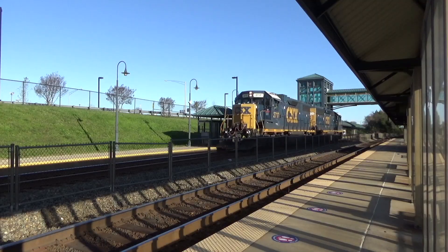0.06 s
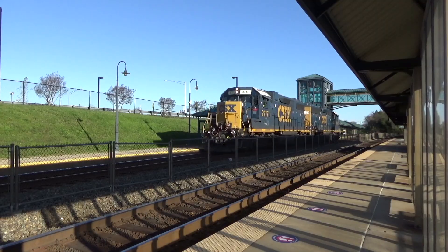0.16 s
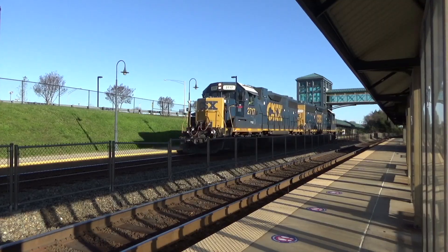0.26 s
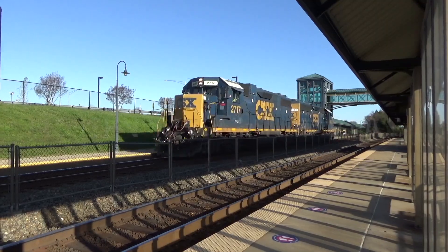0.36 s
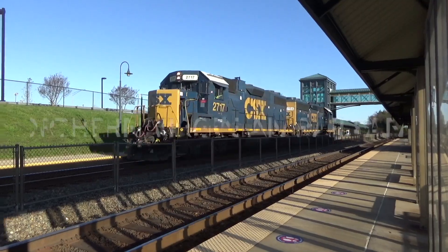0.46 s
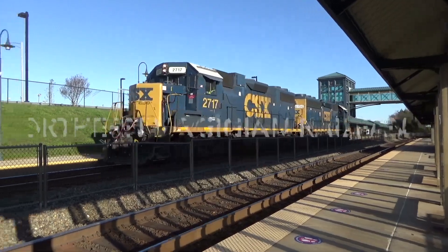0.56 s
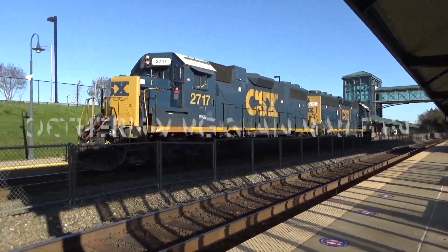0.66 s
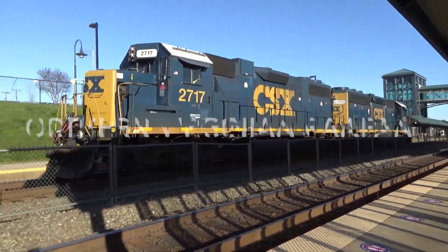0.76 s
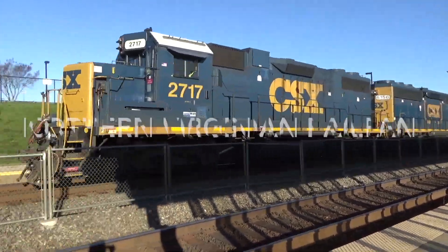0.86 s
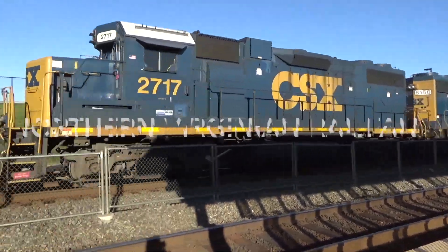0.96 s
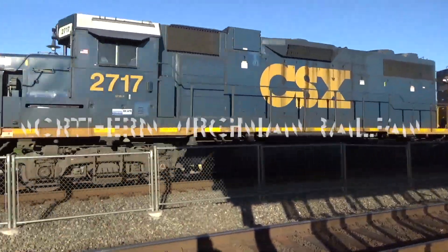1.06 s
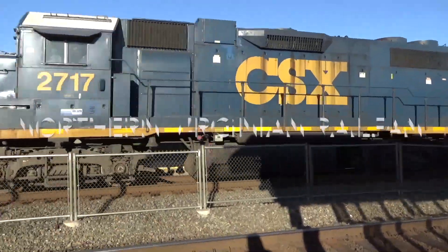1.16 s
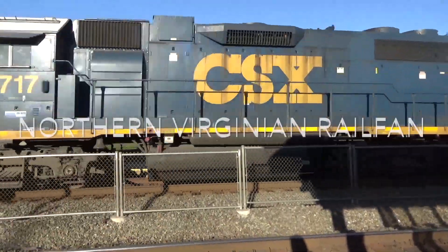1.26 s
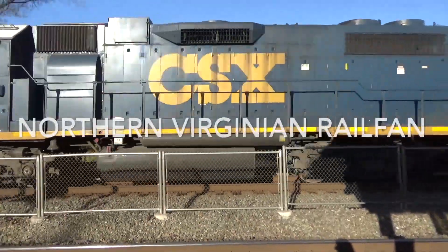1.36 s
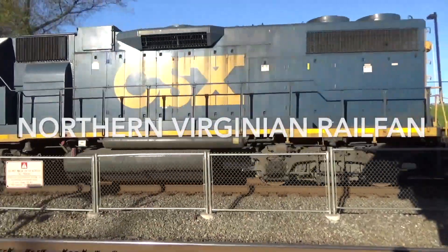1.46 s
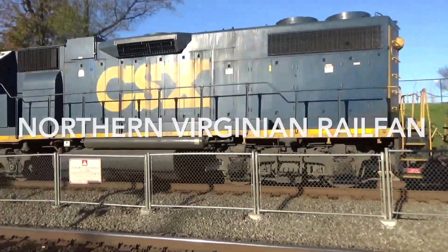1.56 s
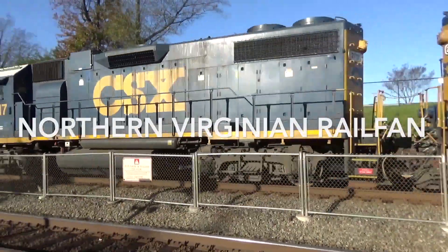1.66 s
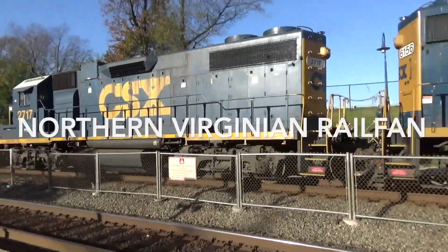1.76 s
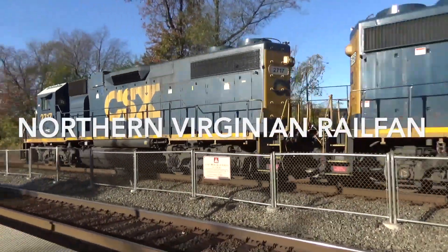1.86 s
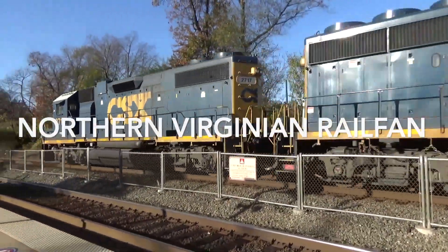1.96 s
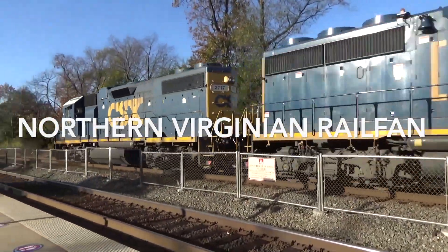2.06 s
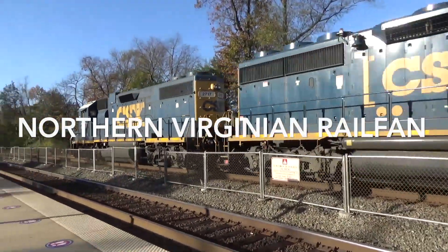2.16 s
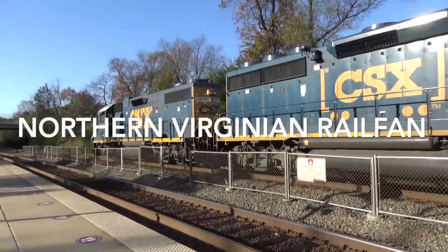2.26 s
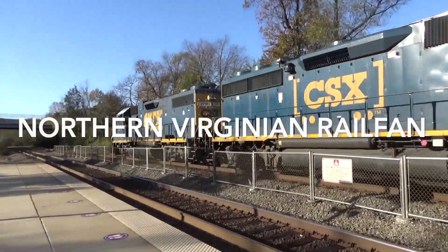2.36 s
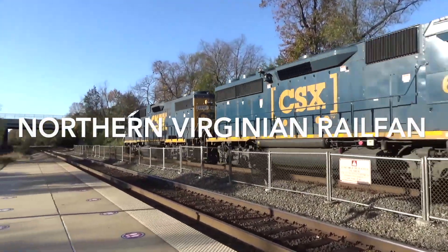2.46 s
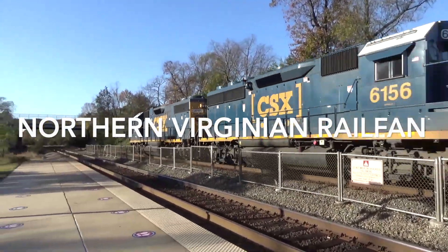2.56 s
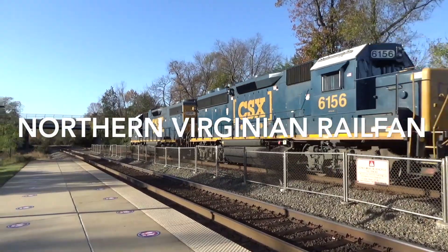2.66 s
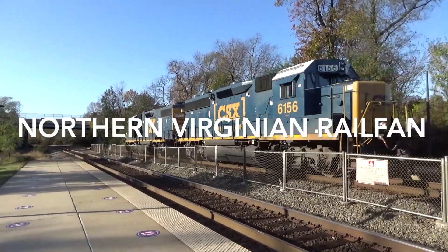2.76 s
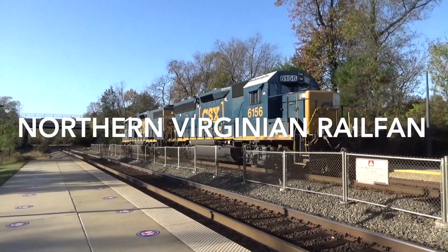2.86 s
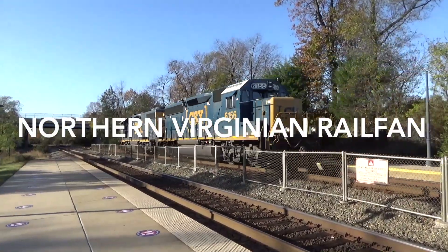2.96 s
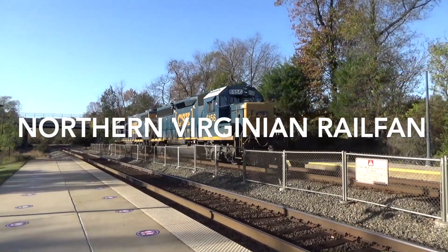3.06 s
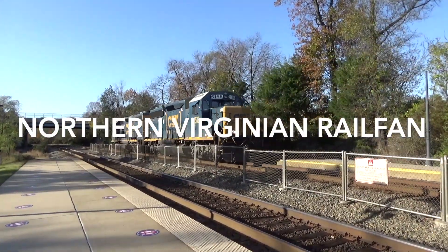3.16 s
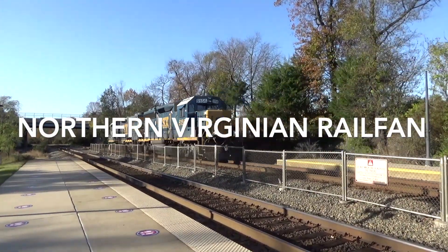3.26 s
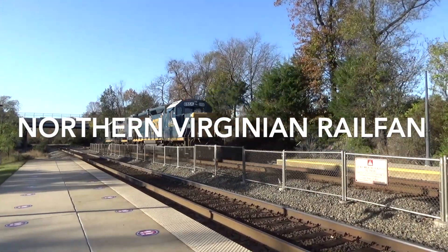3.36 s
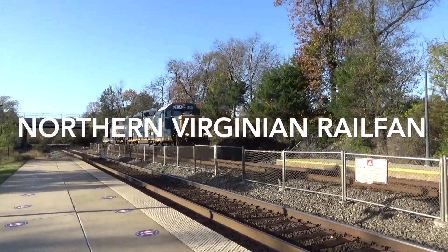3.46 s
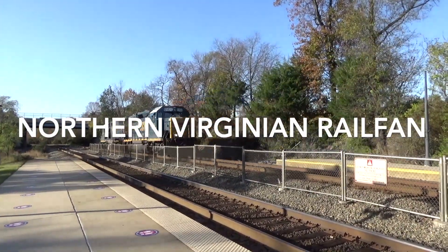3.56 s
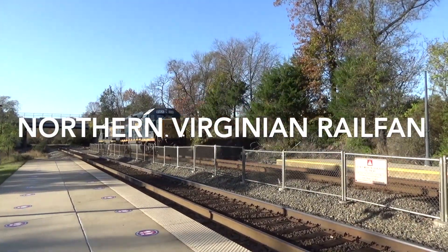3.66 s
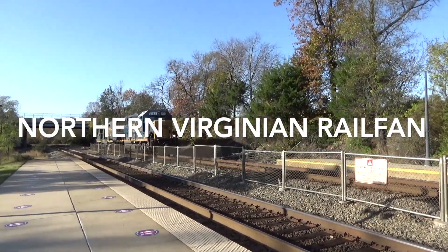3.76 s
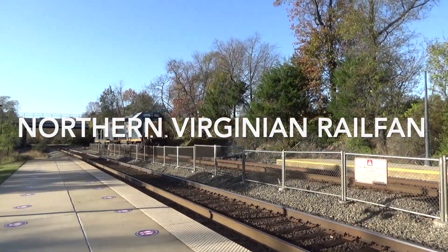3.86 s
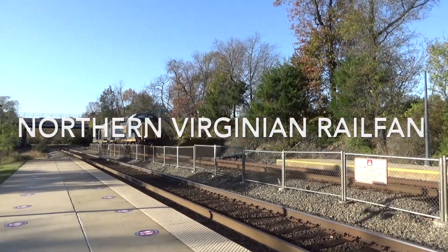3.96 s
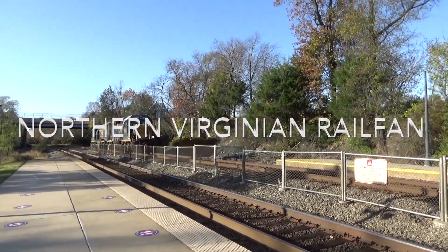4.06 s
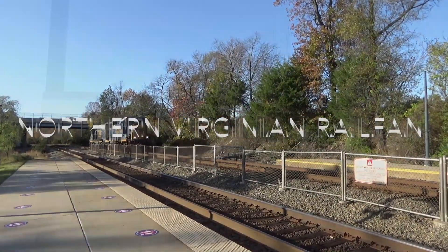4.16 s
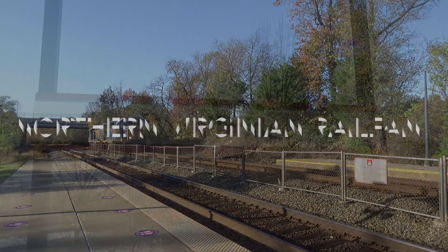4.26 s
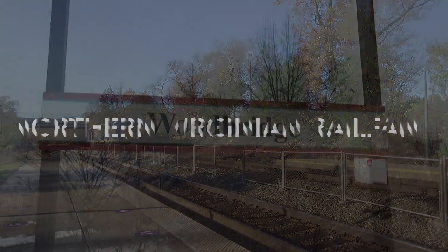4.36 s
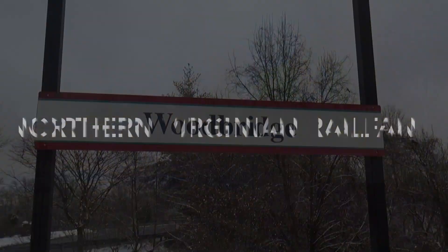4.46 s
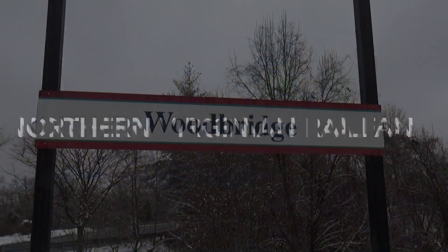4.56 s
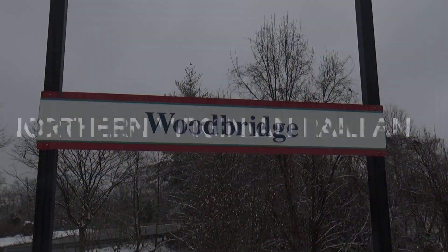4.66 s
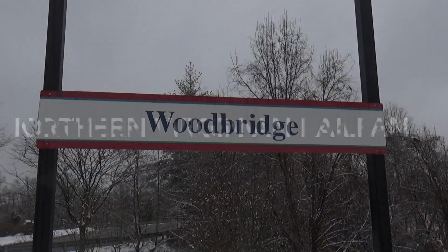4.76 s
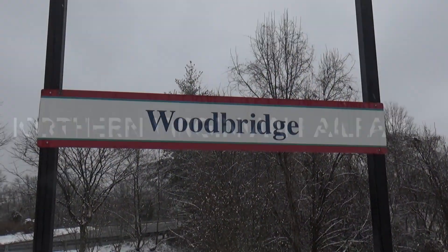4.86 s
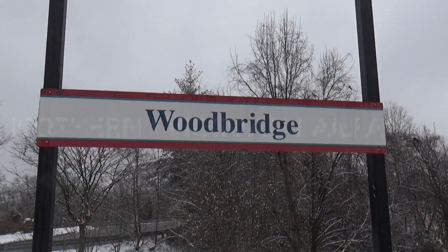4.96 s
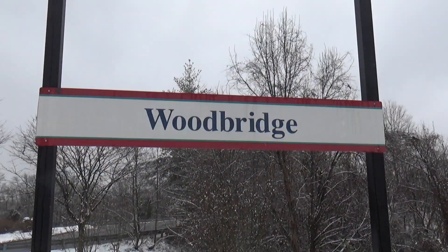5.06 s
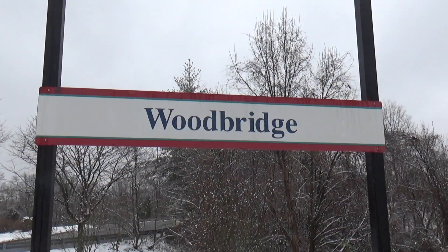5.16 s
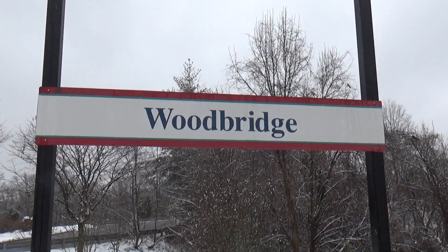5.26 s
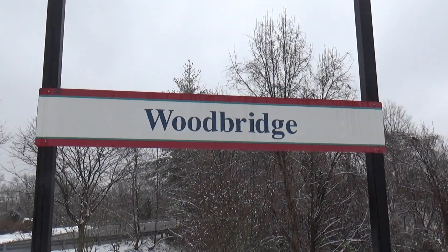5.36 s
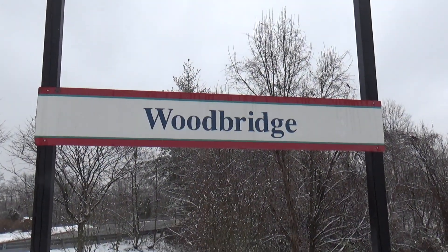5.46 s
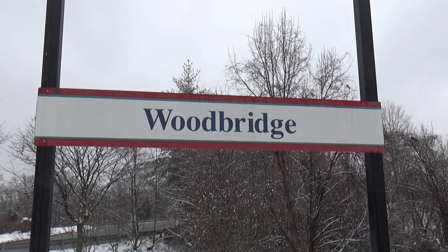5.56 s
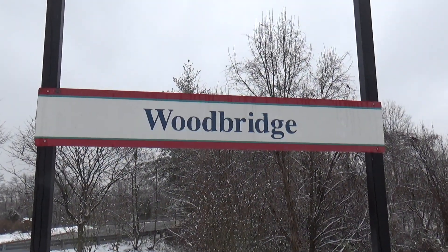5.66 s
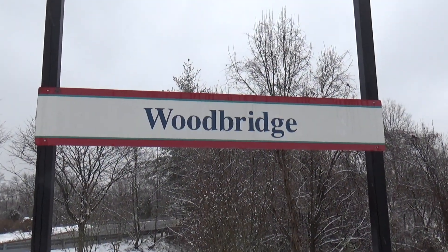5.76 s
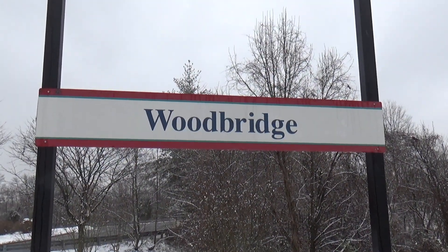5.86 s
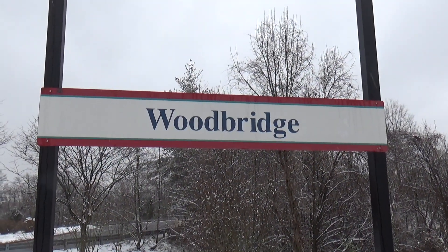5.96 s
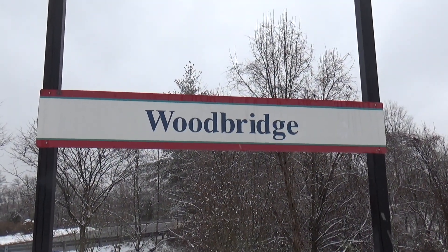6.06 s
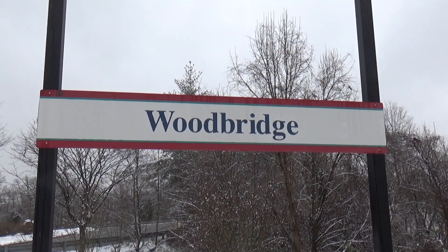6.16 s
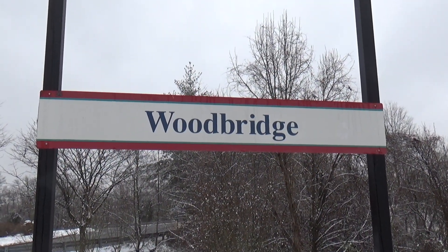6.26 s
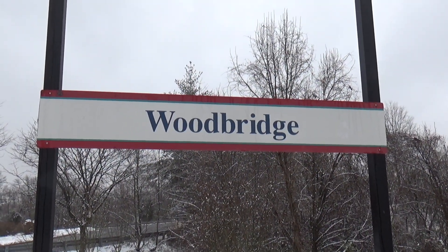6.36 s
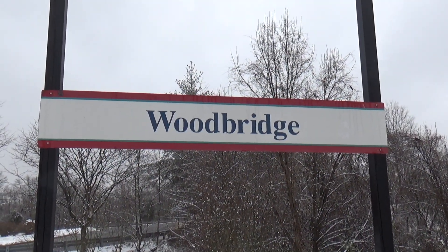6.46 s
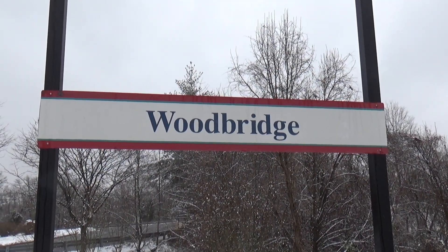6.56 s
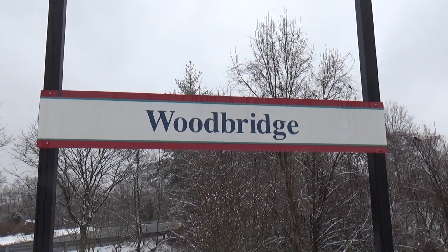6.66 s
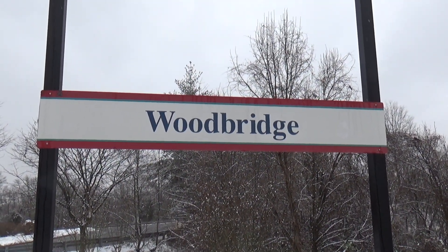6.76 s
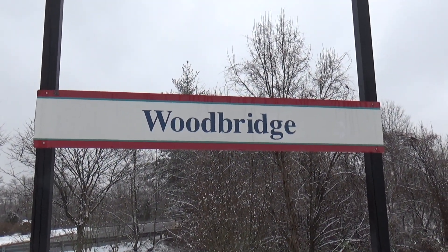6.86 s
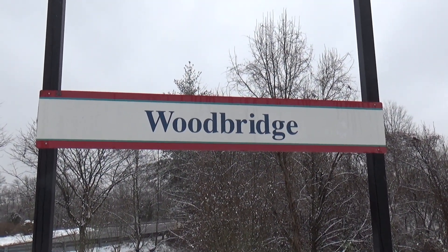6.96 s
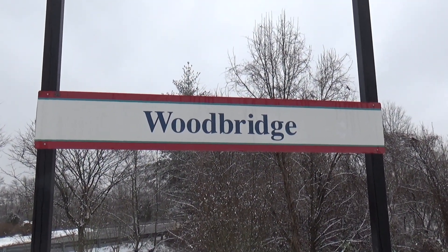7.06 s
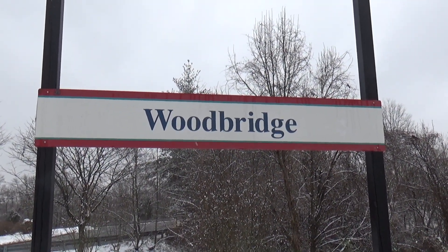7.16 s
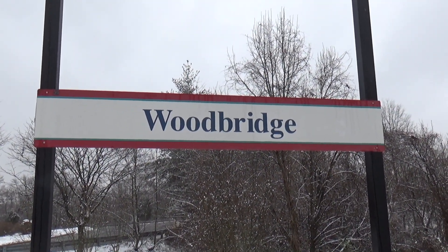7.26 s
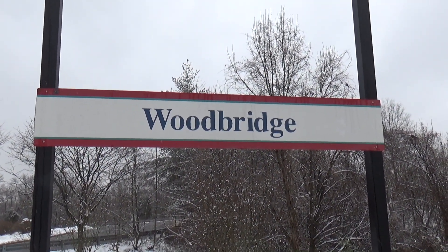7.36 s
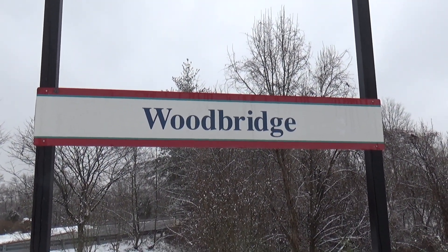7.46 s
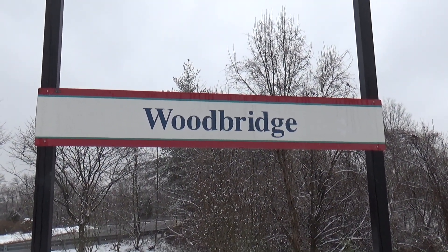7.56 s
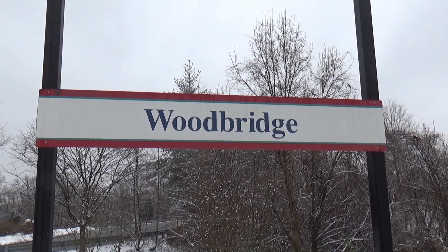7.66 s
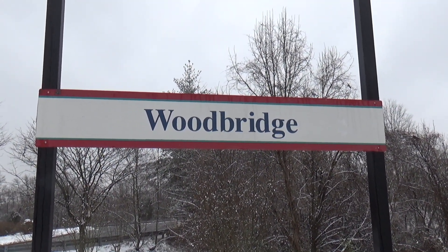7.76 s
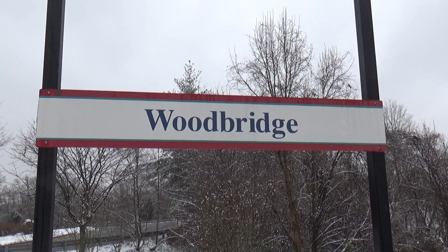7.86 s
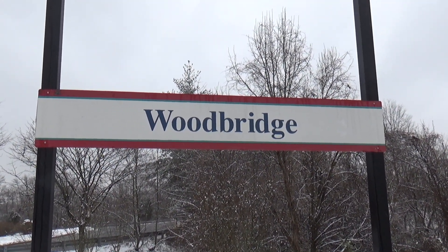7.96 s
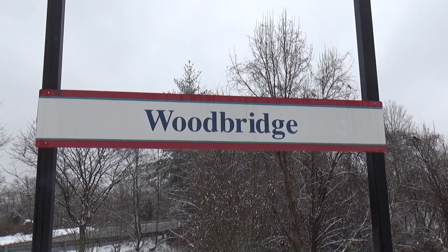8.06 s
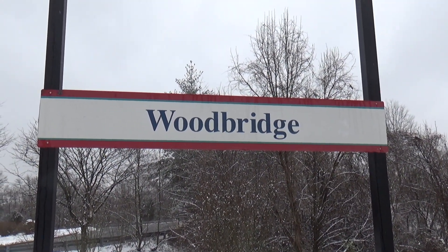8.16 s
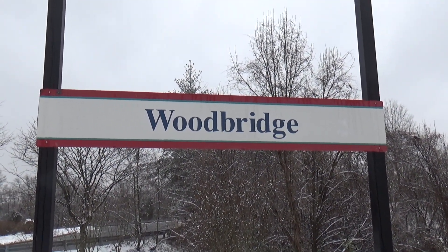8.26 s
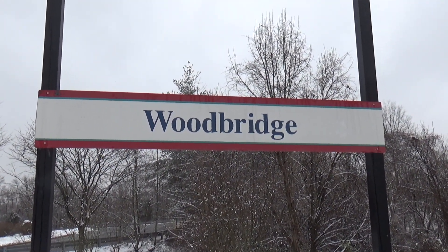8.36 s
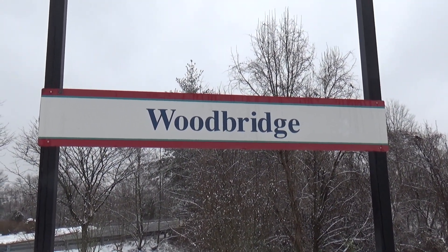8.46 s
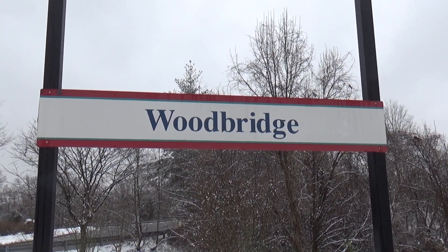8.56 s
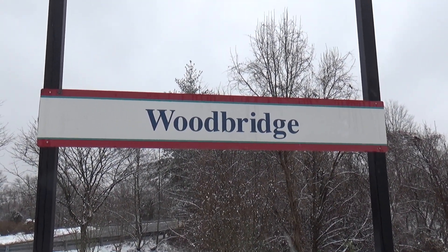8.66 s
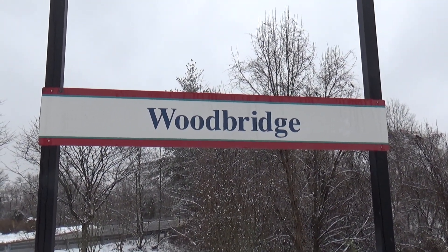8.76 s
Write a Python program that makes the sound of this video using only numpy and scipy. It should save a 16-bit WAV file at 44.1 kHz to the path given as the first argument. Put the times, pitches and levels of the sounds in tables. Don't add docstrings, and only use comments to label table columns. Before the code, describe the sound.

Two diesel locomotives roar closely past a platform, bell clanging and sliding down in pitch, flat wheel thumping, then quiet wet-road hiss and ticking sleet.

```python
import sys
import numpy as np
from scipy import signal
from scipy.fft import rfft, irfft, next_fast_len
from scipy.io import wavfile
from scipy.ndimage import uniform_filter1d

SR = 44100
rng = np.random.default_rng(int(sys.argv[2]) if len(sys.argv) > 2 else 0)


def generate_wav(signal):
    frames = np.transpose(np.atleast_2d(signal))
    scaled = np.clip(frames, -1, 1) * 32767
    pcm = np.round(scaled).astype(np.int16)
    wavfile.write(sys.argv[1], SR, pcm)


def convert_level_to_amplitude(level_db):
    exponent = np.asarray(level_db, float) / 20
    return 10 ** exponent


N = 388521
T = np.arange(N) / SR
LEFT_RIGHT = np.array([[1], [-1]])


def curves(table):
    s, *columns = np.transpose(table)
    return [np.interp(T, s, c) for c in columns]


def at(table, hz):
    table_hz, values = np.transpose(table)
    return np.interp(np.log(hz), np.log(table_hz), values)


def walk(rate_hz):
    k = int(SR / rate_hz)
    steps = rng.standard_normal(1000)
    held = np.repeat(steps[:N // k + 1], k)
    return 1.06 * uniform_filter1d(uniform_filter1d(held, k), k)[:N]


def ring(x, hz, width_hz):
    return signal.lfilter(*signal.iirpeak(hz, hz / width_hz, SR), x)


def body(x, modes):
    return sum(convert_level_to_amplitude(db) * ring(ring(x, hz, w), hz, w) * np.sqrt(SR / 2 / w) for hz, w, db in modes)


def swells(times_s, dbs, rise_s, fall_s):
    kicks = np.zeros(N)
    np.add.at(kicks, (np.asarray(times_s) * SR).astype(int), convert_level_to_amplitude(np.asarray(dbs)))
    t = T[:SR // 4]
    shape = (1 - np.exp(-t / rise_s)) * np.exp(-t / fall_s)
    return signal.fftconvolve(kicks, shape / shape.max())[:N]


def bands(colour, side, phase, start_s, stop_s):
    first, last = int(start_s * SR), min(int(stop_s * SR), N)
    size = next_fast_len(last - first)
    f = np.maximum(np.arange(size // 2 + 1) * SR / size, 1)
    noise = rfft(rng.standard_normal((2, size))) * convert_level_to_amplitude(at(colour, f))
    noise[1] *= convert_level_to_amplitude(at(side, f))
    noise /= np.std(irfft(noise[0], size))
    lead = np.exp(.5j * at(phase, f) * LEFT_RIGHT)
    noise = (noise[0] + noise[1] * LEFT_RIGHT) * lead
    for hz in 30 * 2 ** np.arange(0, 9.6, .5):
        share = np.cos(np.pi / 2 * np.clip(2 * np.log2(f / hz), -1, 1)) ** 2
        pair = np.zeros((2, N))
        pair[:, first:last] = irfft(noise * share, size)[:, :last - first]
        yield hz, pair


ROAR_HZ = [140, 650, 2600, 8000]
# frequency in Hz, level in dB per Hz.
ROAR_COLOUR = [(15, -61), (25, -32), (111, -19), (258, -6), (398, -2.5), (443, -1.5), (648, 0), (1060, -4),
               (1390, -8.5), (2880, -12), (8080, -22), (9500, -24), (12800, -40.5), (15100, -48),
               (16400, -63)]
# frequency in Hz, side minus mid in dB.
ROAR_SIDE = [(60, -17), (110, -20), (200, -16), (380, -13.5), (700, -8), (1290, -8.5), (2380, -12),
             (4400, -47), (8120, -21.5), (15000, -43)]
# frequency in Hz, lead of the left port in radians.
TRAIN_PHASE = [(40, -.2), (130, -0.33), (300, -0.59), (700, -0.49), (1400, -0.16), (3000, 0)]
# frequency in Hz, share of the pan that shows.
PAN_SHARE = [(60, 0), (250, 0.3), (700, 0.79), (2000, 0.76), (5000, 0.66), (12000, 0)]
# time in seconds, level in dB, left minus right in dB.
TRAIN = [(0, -21.5, -3.5), (.54, -19, .5), (.72, -18.5, -0.5), (.93, -17, -1), (1.15, -20, -0.5),
         (1.4, -20, -4.5), (1.81, -20, -8), (1.97, -21, -9.5), (2.31, -22, -9.5), (2.66, -18.5, -4),
         (3.06, -22, -2.5), (3.4, -22.5, -2), (3.82, -25.5, 0.5), (4.25, -24.5, 0.5), (4.9, -26.5, .7)]
# peak in seconds, level in dB over the steady hiss.
GUSTS = [(.149, 5), (.239, 10), (.419, 10), (.929, 11.5), (1.164, 12.5), (1.284, -2.5), (1.359, 9),
         (1.629, 7.5), (1.909, -2), (1.989, 12), (2.389, 12)]


def roar():
    rumble_sag_db_per_s, hiss_sag_db_per_s = 1.6, 1.5
    body_per_pan_db = 0.4
    top_returns_s, top_return_db_per_s = 3.2, 3.5
    level_db, pan_db = curves(TRAIN)
    parts = [level_db - rumble_sag_db_per_s * T, level_db - body_per_pan_db * pan_db,
             level_db, level_db - hiss_sag_db_per_s * T]
    parts = [p - np.mean(p[int(1.2 * SR):int(2.6 * SR)]) for p in parts]
    blow_s, _, _, hiss_db = blows()
    gust_s, gust_db = np.transpose(GUSTS)
    rush = swells(blow_s - .004, hiss_db, rise_s=0.05, fall_s=0.02)
    rush = rush + swells(gust_s, gust_db, rise_s=0.015, fall_s=0.026)
    out, surge = 0, walk(8.5)
    for hz, pair in bands(ROAR_COLOUR, ROAR_SIDE, TRAIN_PHASE, 0, 4.9):
        weights = [np.interp(np.log(hz), np.log(ROAR_HZ), row) for row in np.eye(4)]
        octaves = np.log2(hz / ROAR_HZ[3])
        top_db = 1.73 * max(octaves, 0) * np.maximum(parts[3] - parts[2], -.6)
        returned_s = np.maximum(T - top_returns_s, 0)
        top_db = top_db + top_return_db_per_s * np.clip(octaves + 0.1, 0, 1) * returned_s
        db = sum(w * p for w, p in zip(weights, parts)) + top_db + .55 * surge + 1.1 * walk(14)
        treble = min(hz / 1800, 1) * (1 + (hz / 17000) ** 3)
        shaken = np.sqrt(1 + (0.19 * rush * treble) ** 2)
        out = out + pair * shaken * convert_level_to_amplitude(db + at(PAN_SHARE, hz) * pan_db * LEFT_RIGHT / 2)
    return convert_level_to_amplitude(-16.5) * out


# peak in seconds, span in seconds, frequency in Hz, width in Hz, level in dB.
DRONES = [
    (.15, 0.47, 484, 40, -23.5),
    (1.3, 0.22, 446, 40, -25.5),
    (2.3, 0.22, 254.5, 25, -36),
    (4.3, 0.4, 190, 25, -40),
]


def drones():
    noise = rng.standard_normal(N)
    return sum(np.exp(-((T - s) / span_s) ** 2) * body(noise, [mode]) for s, span_s, *mode in DRONES)


def passing():
    speed_m_s, passes_s, track_m, tune = 22.6, 1.2, 7.2, .948
    near_db, spread = 3, 0.87
    along_m = speed_m_s * (T - passes_s)
    away_m = np.hypot(along_m, track_m)
    ratio = tune / (1 + speed_m_s / 343 * along_m / away_m)
    return ratio, near_db - spread * 20 * np.log10(away_m / track_m)


# time in seconds, blow in dB, treble tilt in dB per octave from 2 kHz (negative dulls).
STRIKES = [
    (-.19, 2.5, 6),
    (.748, .5, 0),
    (1.67, -5.5, 0),
    (2.63, -3, -3),
    (3.6, -5, -5),
    (4.562, 6, -12),
]
# frequency in Hz, level in dB, t60 in seconds, split of the mode pair in Hz,
# beat depth (negative starts soft).
BELL = [
    (1175, -23.5, 3.4, 1.8, -.85),
    (2258, -15, .7, 11, -.6),
    (2535, -18, 1.4, 14, -.4),
    (4262, -18.5, .9, 8, -.3),
    (6397, -20, .5, 3, .3),
    (8638, -24.5, .4, 3, .2),
    (11100, -38, .3, 3, .2),
]


def bell():
    ratio, near_db = passing()
    clock_s = np.cumsum(ratio) / SR
    out = np.zeros(N)
    flutter = [convert_level_to_amplitude(min(hz / 650, 3.8) * walk(78)) for hz, *_ in BELL]
    waver = [.08 * hz / 2000 * walk(105) for hz, *_ in BELL]
    chances = rng.random((len(STRIKES), len(BELL)))
    for (s, blow_db, dull_db), chance in zip(STRIKES, chances):
        on = slice(max(int(s * SR), 0), int(4.9 * SR))
        age_s = T[on] - s
        attack = np.minimum(age_s / 0.024, 1)
        for k, (hz, db, t60_s, split_hz, depth) in enumerate(BELL):
            tone = np.sin(2 * np.pi * (hz * clock_s[on] + chance[k] + waver[k][on]))
            pair = tone * (1 + depth * np.cos(2 * np.pi * split_hz * age_s))
            octaves = max(np.log2(hz / 2000), -1 if dull_db > 0 else 0)
            db = db + blow_db + dull_db * octaves - 60 * age_s / t60_s
            out[on] += convert_level_to_amplitude(db) * attack * flutter[k][on] * pair
    return out * convert_level_to_amplitude(near_db + 0.37 * curves(TRAIN)[1] * LEFT_RIGHT / 2)


# time in seconds, blow peak in dB, rush in dB over the steady hiss.
THUMPS = [(2.316, -9.5, -59), (2.46, -19, -35), (2.593, -23, -8), (2.734, -19.5, 12), (2.873, -15, 16),
          (3.012, -17, 14.5), (3.155, -11.5, 17), (3.289, -11.5, 18.5), (3.438, -14, 18.5),
          (3.574, -8.5, 18), (3.71, -7.5, 20.5), (3.852, -6.5, 16), (3.994, -7.5, 14), (4.135, -12, 13),
          (4.28, -15, 11), (4.423, -13, 9), (4.557, -15, 5)]


def blows():
    thud_db = -1
    second_s, second_db, second_thud_db, second_rush_db = 0.046, -8.5, -2.5, -13.5
    s, db, rush_db = np.transpose(THUMPS)
    return (np.r_[s, s + second_s],
            np.r_[db, db + second_db],
            np.r_[db + thud_db, db + second_db + second_thud_db],
            np.r_[rush_db, rush_db + second_rush_db])


# frequency in Hz, width in Hz, level in dB.
WHEEL_RING = [(1041, 170, 4), (1260, 390, -7), (1980, 470, -16)]
# frequency in Hz, width in Hz, level in dB.
BOGIE_THUD = [(385, 310, -11), (597, 310, -2)]


def flat_wheel():
    s, db, thud_db, _ = blows()
    noise = rng.standard_normal((2, N))
    wheel = body(swells(s - .006, db - 12.5, rise_s=0.006, fall_s=0.018) * noise, WHEEL_RING)
    bogie = body(swells(s + 0.0018, thud_db - 7, rise_s=0.0064, fall_s=0.013) * noise, BOGIE_THUD)
    mid, side = wheel + bogie
    return mid + convert_level_to_amplitude(-13.5) * side * LEFT_RIGHT


# time in seconds, peak in dB, pitch in Hz, left minus right in dB,
# wetness as share of ringing tail.
SLEET = [(4.6331, -19, 9800, 2, 0.23), (5.0653, -18, 7000, 3, 1.2), (5.078, -23, 10500, -.5, .6),
         (5.291, -23, 5900, 7, .2), (5.4036, -19, 6400, 5, 0.14), (5.4436, -16, 5470, 7, 0.19),
         (5.4929, -14.5, 9330, -6, .31), (5.4944, -15.5, 9400, 6, 0.59), (5.577, -21.5, 5750, 7, .15),
         (5.798, -28, 4790, .5, .25), (6.1468, -22.5, 4040, -.5, 0.21), (6.314, -29, 4880, -.5, .25),
         (6.7302, -23, 5350, 5, 0.27), (7.1172, -24, 8660, 2, .2), (7.425, -26.5, 4650, -.5, 1.1),
         (7.671, -23, 4620, -.5, .28), (8.0605, -21, 5800, 6, .25), (8.0885, -27, 9900, 3, .27),
         (8.3152, -21, 5440, 7, 0.43), (8.3272, -25, 9500, .5, 0.089), (8.669, -25, 8020, -3, .27)]
# time in seconds, peak in dB.
GRAINS = [(4.9125, -30), (4.973, -29), (4.9902, -23), (5.261, -29), (5.64, -31), (5.6658, -33), (5.77, -29),
          (5.8752, -32), (6.045, -28), (6.0935, -30), (6.1894, -29), (6.256, -28), (6.3507, -30),
          (6.695, -28), (6.7867, -29), (6.8242, -29), (7.073, -29), (7.1727, -37), (7.2546, -32),
          (7.3284, -31), (7.4168, -34), (7.4812, -35), (7.6555, -29), (7.7414, -29), (7.9444, -30),
          (8.012, -33), (8.1781, -30), (8.3911, -34), (8.5672, -35), (8.7846, -32)]


def sleet(count=260, patter_db=-43):
    shell_low_db = -9
    faint_db = -26
    t = T[:int(.02 * SR)]
    out = np.zeros((2, N + len(t)))
    grains = []
    for u, v, w in rng.random((count, 3)):
        peak_db = patter_db + min(-3.5 * np.log(v), 8)
        grains.append((4.72 + 4.08 * u, peak_db, 6500 + 3500 * w, 3 * (w - v), .2))
    for (s, db), (u, v) in zip(GRAINS, rng.random((len(GRAINS), 2))):
        grains.append((s, db, 6000 + 3500 * u, 8 * (v - .4), .25))
    grains += list(SLEET)
    grits = rng.standard_normal((len(grains), len(t)))
    for (s, db, hz, pan_db, tail), grit in zip(grains, grits):
        burst = grit * (np.exp(-t / 0.00014) + 0.46 * tail * np.exp(-t / 0.0021))
        tick = ring(burst, hz, 0.62 * hz) + .5 * ring(burst, 5000, 1400)
        tick = tick + convert_level_to_amplitude(shell_low_db) * ring(burst, 2700, 2000)
        if db < faint_db:
            tick = ring(tick, 8100, 6500)
        level = convert_level_to_amplitude(db + 3.5 + pan_db * LEFT_RIGHT / 2)
        first = int(s * SR)
        out[:, first:first + len(t)] += level * tick / np.abs(tick).max()
    return signal.lfilter(*signal.butter(2, 13000, fs=SR), out[:, :N])


# time in seconds, firing rate in Hz, level in dB.
LORRY = [(4.6, 95, -61), (4.76, 102.7, -59), (5.2, 115.7, -51.5), (5.54, 126, -54.5), (5.6, 128.3, -59),
         (6.05, 110.7, -54), (6.27, 93.8, -66), (6.46, 74.6, -62), (6.56, 83.6, -61.5), (8.07, 101, -56.5),
         (8.81, 117.7, -57)]
OVERTONES_DB = [1, -14.5, -11.5]


def lorry():
    coasting_db = -2
    pipe_hz, pipe_width_hz, pipe_db = 246, 38, 11.5
    hz, level_db = curves(LORRY)
    turn = 2 * np.pi * np.cumsum(hz * (1 + 0.0035 * walk(8))) / SR
    coasting = uniform_filter1d(1. * (np.gradient(hz) < 0), SR // 20)
    out = 0
    for multiple, overtone_db in enumerate(OVERTONES_DB, 1):
        lift_db = pipe_db / (1 + ((multiple * hz - pipe_hz) / pipe_width_hz) ** 2)
        db = level_db + overtone_db + coasting_db * coasting * (multiple > 1) + lift_db
        out = out + convert_level_to_amplitude(db + 1.3 * walk(9)) * np.sin(multiple * turn)
    return np.sqrt(2) * out


# frequency in Hz, level in dB per Hz.
ROAD = [(100, -41), (170, -7.5), (249, -5.5), (379, -5.5), (846, 2), (2200, -1), (2820, -3), (3900, -4),
        (9220, -16), (14600, -36), (15400, -32), (16400, -56)]
ROAD_DB = -39
# frequency in Hz, level in dB per Hz.
ROAD_LOW = [(20, -42), (45, -19), (100, -4)]
# frequency in Hz, side minus mid in dB.
ROAD_SIDE = [(60, -31), (110, -36), (200, -26), (380, -17), (700, -11.5), (1290, -7), (2380, -3.5),
             (4400, -7), (8120, -8.5), (15000, -52)]
# frequency in Hz, lead of the left port in radians.
ROAD_PHASE = [(100, 0), (1460, -0.42), (3500, 0)]


def road():
    drift = walk(0.79)
    slices = bands(ROAD_LOW + list(ROAD)[1:], ROAD_SIDE, ROAD_PHASE, 4.2, 9)
    out = sum(pair * convert_level_to_amplitude(.5 * drift + .95 * walk(6)) for _, pair in slices)
    return out * convert_level_to_amplitude(ROAD_DB - 0.9 + .3 * LEFT_RIGHT)


def dissolve():
    from_s, to_s = 4.203, 4.904
    return np.clip((T - from_s) / (to_s - from_s), 0, 1)


def scene():
    fade_bend, winter_bend, winter_db = 1.48, 2.2, -1.85
    clang = bell()
    bright = ring(np.mean(clang, axis=0), 4000, 4500)
    power = uniform_filter1d(bright ** 2, int(.03 * SR))
    duck = 1 / np.sqrt(1 + power / convert_level_to_amplitude(-22) ** 2)
    cross = dissolve()
    train = (duck * (roar() + drones()) + clang + flat_wheel()) * (1 - cross) ** fade_bend
    winter = convert_level_to_amplitude(winter_db) * cross ** winter_bend * (road() + lorry())
    return train + winter + sleet()


def top_cut(x):
    return signal.sosfilt(signal.butter(12, 16500, fs=SR, output="sos"), x)


def record(dry):
    mix = np.tanh(0.83 * dry) / 0.77
    return top_cut(mix)


dry = scene()
out = record(dry)
generate_wav(out)
```